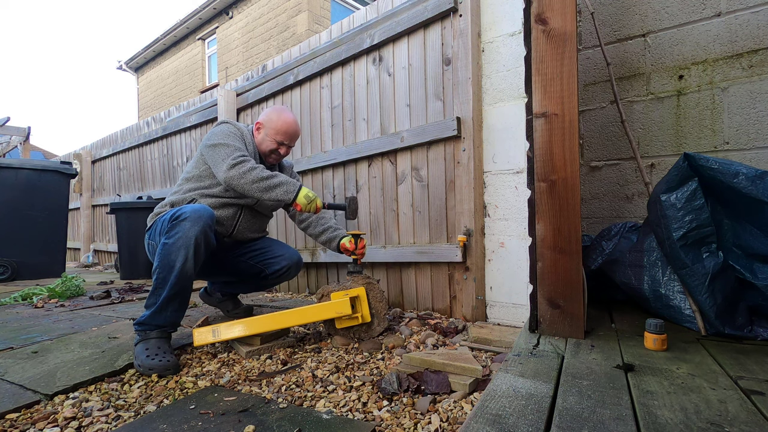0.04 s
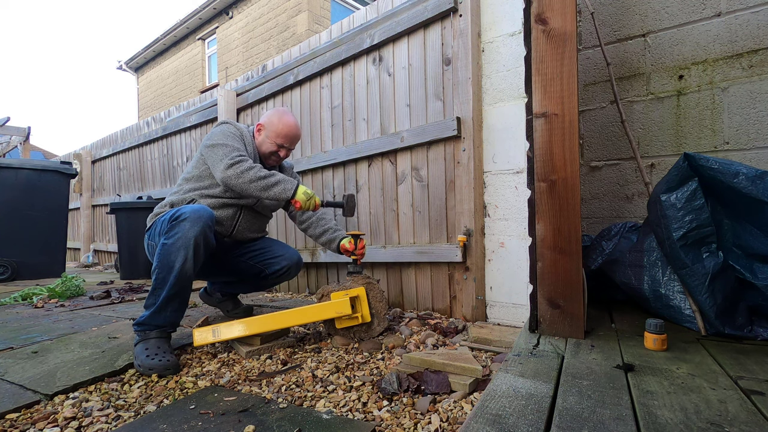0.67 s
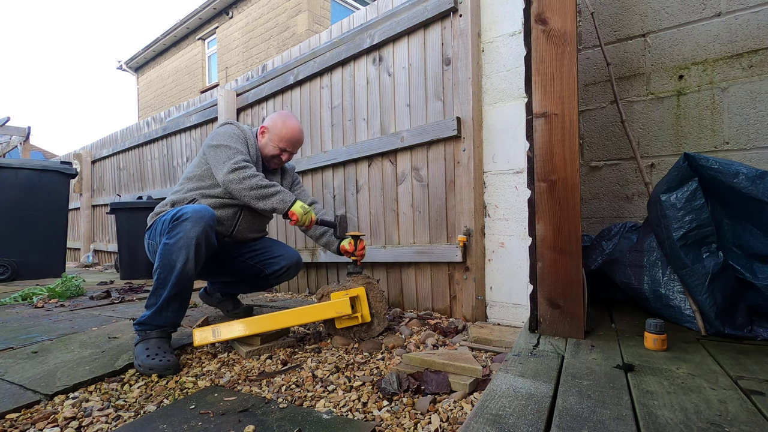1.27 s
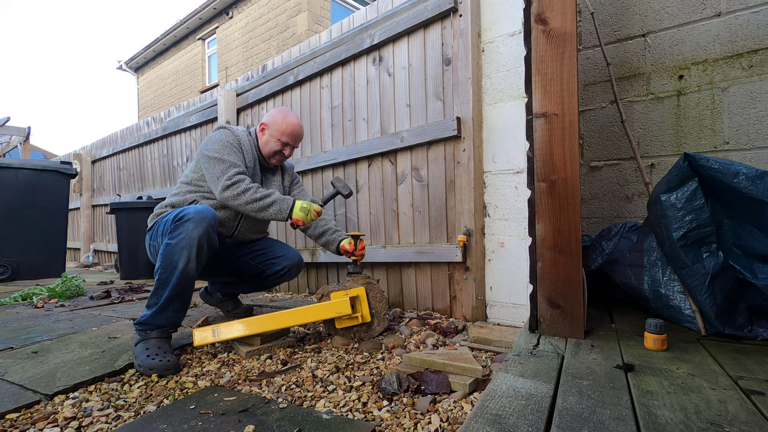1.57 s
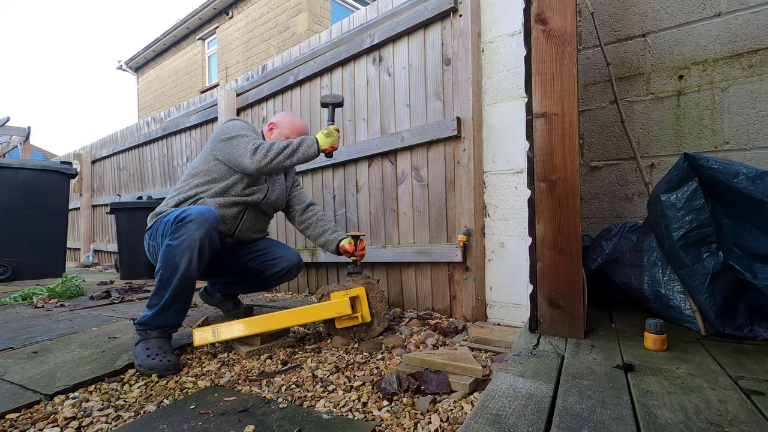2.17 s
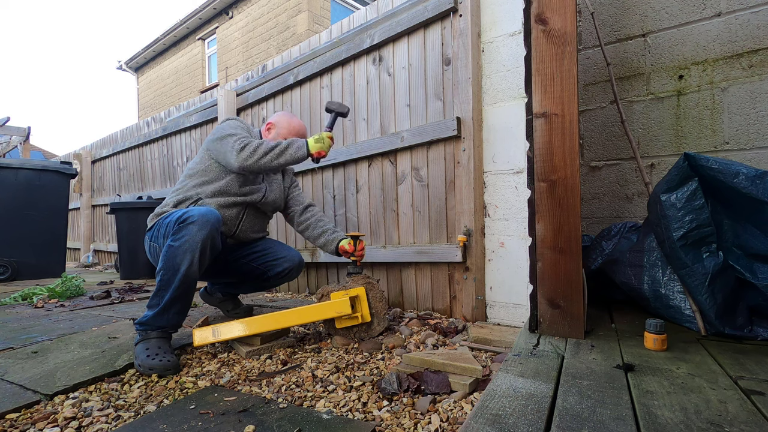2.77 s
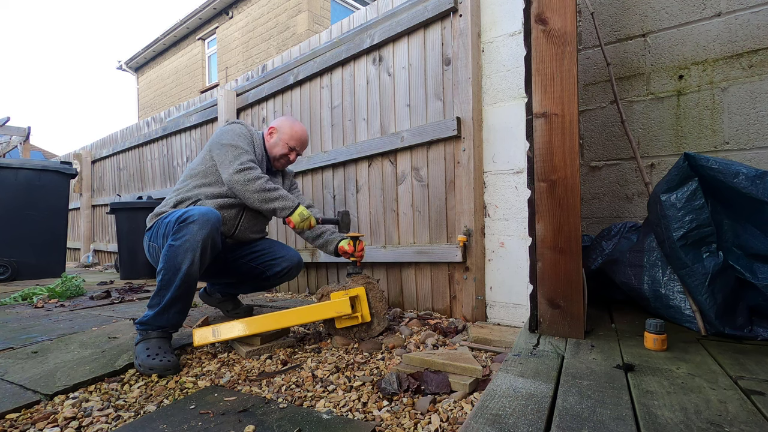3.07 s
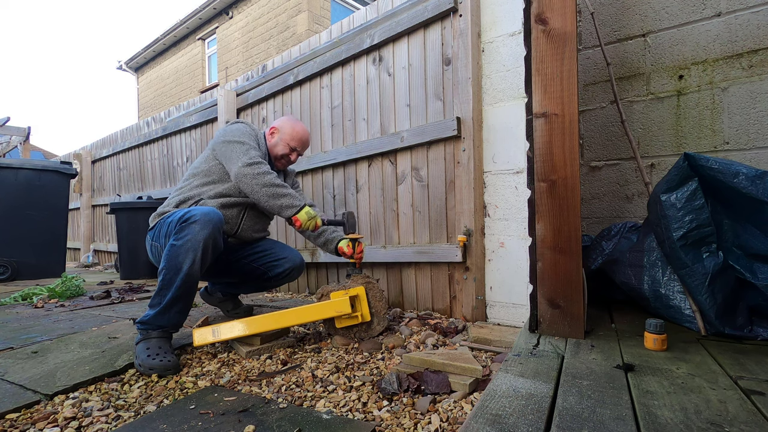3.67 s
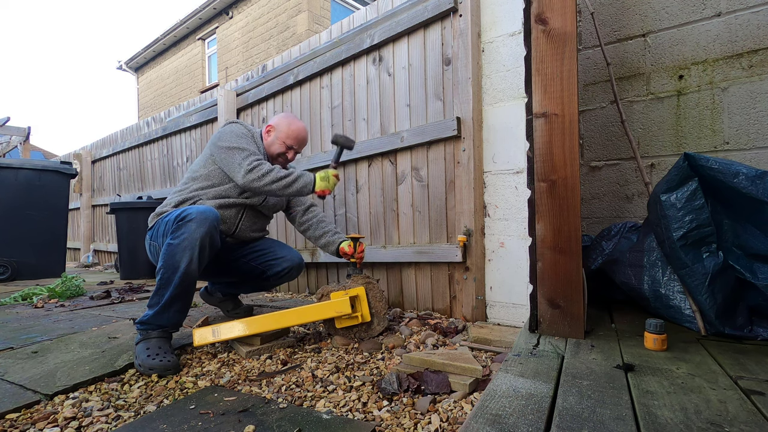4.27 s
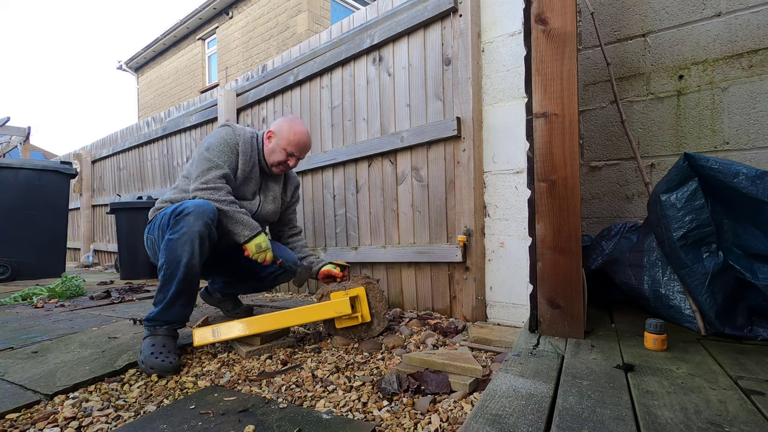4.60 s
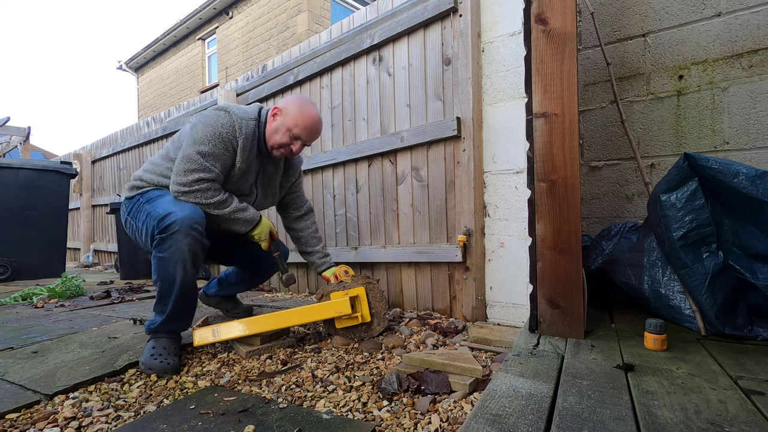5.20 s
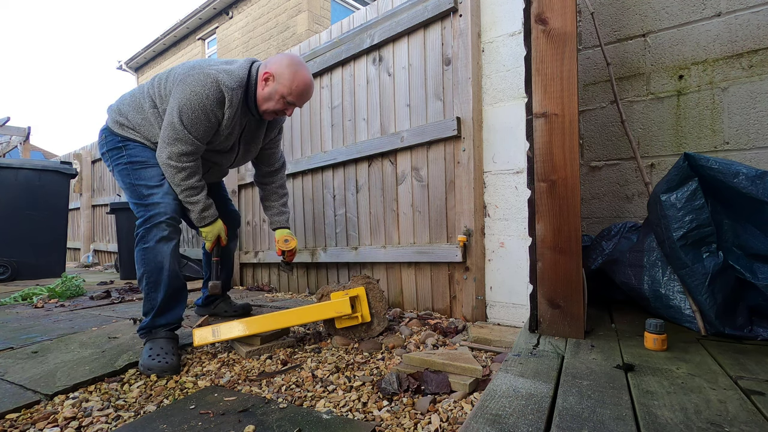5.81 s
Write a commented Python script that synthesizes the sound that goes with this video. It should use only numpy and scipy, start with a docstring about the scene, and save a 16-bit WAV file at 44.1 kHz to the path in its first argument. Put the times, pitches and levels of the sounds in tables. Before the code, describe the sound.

In a small back yard, steel cracks against steel close to the microphone as a hammer hits a chisel eight times, each slightly distorted blow ringing briefly and shaking a wooden fence. The final two are heavier and crush the concrete. Bits of stone fall, the loose chisel clinks faintly, and then the hammering gives way to quiet scuffs on gravel. A small bird and a low town rumble lie far behind.

```python
"""Sharp steel cracks: a club hammer drives a chisel into the concrete at the foot of a fence post.
Each blow overloads the microphone and sets the wooden fence booming and rattling in a small back yard;
the last two swell in harshly and crush the concrete. Chips clatter down, the loose chisel clinks,
boots shift on gravel, and a small bird sings over a far town rumble."""
import sys
import numpy as np
from scipy import signal
from scipy.fft import rfft, irfft, next_fast_len
from scipy.io import wavfile

SR = 44100
rng = np.random.default_rng(int(sys.argv[2]) if len(sys.argv) > 2 else 0)


def pcm_store(signal):
    """Save signal as 16-bit PCM."""
    levels = np.round(np.clip(np.atleast_2d(signal), -1, 1) * 32767)
    wavfile.write(sys.argv[1], SR, levels.astype(np.int16).T)


N = 257984
SIZE = 36000  # samples in a one-shot
AGE, TIME = np.arange(SIZE) / SR, np.arange(N) / SR

# hammer blows: t/s, crack/dB, boom/dB, tail/dB, crunch/dB, crunch t60/s, treble limit/Hz,
# chisel pitch/ratio, left lag/s, left minus right/dB, loosened grit/dB
BLOWS = [(0.0028, 5, 0, -28, -25, 0.29, 13800, 0.95, 0.0001, 1, -56),
         (0.6002, 6.5, 0, -28, -26.5, 0.39, 13000, 0.99, 0.00005, 1, -63),
         (1.2467, 1.5, 0, -27.5, -27, 0.29, 13200, 0.94, 0.000079, 2, -59),
         (1.9399, 2, -13, -36, -18.5, 0.27, 5100, 1.12, 0.000068, 3.5, -78),
         (2.5045, -0.5, -0.5, -27.5, -25, 0.11, 12900, 1.03, 0.000027, 2.5, -54.5),
         (3.14, 2.5, -2, -32, -32.5, 0.46, 13050, 1.023, 0.000058, 0, -64.5),
         (3.8007, 1.5, -2.5, -45.5, -16, 0.35, 12040, 0.97, 0.0000056, 0.9, -54),
         (4.5043, 3, -3.5, -52.5, -17, 0.43, 15000, 0.99, .000005, -0.5, -48)]
# the chisel seats differently each time, one list of resonances a blow: f/Hz, base width/Hz, level/dB
SEATINGS = [
    [(1700, 110, 3), (3160, 220, -1.5), (3640, 200, -3), (4600, 270, -3), (5170, 250, -5.5),
     (6400, 340, -2)],
    [(1650, 160, -5), (2470, 180, -3.5), (3750, 520, -4), (4340, 350, -1), (5060, 300, -10.5),
     (5900, 550, -8)],
    [(1680, 130, -20), (2400, 180, 0), (2770, 190, -3), (3720, 190, -6.5), (4260, 140, 2), (4760, 170, -4),
     (6280, 410, -7), (8540, 300, -12)],
    [(1510, 77, 8), (2500, 110, 4.5), (2885, 510, -1.5), (4100, 470, 0)],
    [(2380, 110, -3), (2730, 120, 3.5), (3670, 260, -6), (4370, 200, 3.5), (6370, 420, -2),
     (8480, 320, -7.5)],
    [(2300, 120, -5.5), (2910, 220, 4.5), (5060, 400, 4), (6560, 300, -9.5), (7900, 240, -5.5)],
    [(2210, 390, 1), (2470, 48, 1.5), (3460, 140, -1), (4030, 170, -2), (4240, 120, -6), (4580, 76, -3),
     (5350, 310, -16), (7850, 210, -22), (8600, 190, -20)],
    [(1350, 57, 3.5), (1790, 89, -2), (2180, 160, -3.5), (4060, 250, -8), (5030, 230, -20),
     (6170, 230, -15), (8550, 560, -15.5)],
]
# modes of the chisel pressed into concrete, the chisel held loosely, the fence: f/Hz, level/dB, t60/s
CHISEL_MODES = [(1740, -5.5, 0.0083), (2920, -11.5, 0.014), (4333, 1.5, 0.007), (5200, -19.5, 0.0096),
                (8350, -16.5, 0.012)]
LOOSE_CHISEL_MODES = [(1900, 4.5, 0.107), (1992, -1, 0.16), (2200, -29, .17), (2720, -4, 0.16),
                      (2780, 3, 0.028)]
FENCE_MODES = [(30, -30.5, 1), (43.7, -20.5, 0.84), (53.7, -34, 0.9), (75.65, -20, 0.56),
               (100.9, -18.5, 0.39), (116, -32.5, 0.2), (143.1, -27.5, 0.4), (170.3, -25, 0.28),
               (195, -16.5, 0.048), (305, -17.5, .06), (436.7, -36.5, 0.2)]
# tone curves of the noise layers: f/Hz, level/dB
CRACK_EQ = [(150, -10), (350, -7.5), (750, -17.5), (1600, -1.5), (4400, 0.5), (7000, -5.5), (11000, -11.5),
            (16000, -13)]
BOARDS_EQ = [(30, -9), (90, 9.5), (160, 5), (240, -1), (330, -6.5), (450, -17), (650, -36), (1500, -53.5)]
TAIL_EQ = [(300, -8), (600, -13), (1000, -16.5), (1600, -6.5), (3200, -7.5), (4700, -5.5), (6000, -17),
           (8500, -13.5), (10500, -20.5), (13000, -41.5), (16000, -57)]
CRUNCH_EQ = [(200, -5.5), (450, -6.5), (700, -11), (1400, -5.5), (2200, -3.5), (3100, -5), (4600, -3),
             (6500, -10), (8500, -17), (11000, -22), (14000, -29), (16000, -48)]
STONE_EQ = [(150, -13.5), (400, 8), (750, -10), (1400, 9), (4500, -6.5), (7500, -9), (11000, -25.5),
            (14000, -36), (16000, -41.5)]
GRIT_EQ = [(250, -4.5), (420, 0), (750, -2), (1300, -0.5), (2000, 2), (3000, -5), (5000, -7), (8000, -15),
           (12000, -19), (14000, -32), (16000, -49)]
TOWN_EQ = [(15, 6), (30, 6.5), (50, 2), (100, -4), (180, 1), (250, -8.5), (400, -22.5), (630, -32),
           (1000, -23.5), (2000, -35.5), (4500, -33.5), (8000, -40), (11000, -51.5), (14000, -74.5)]
# decay of the ringing tail: f/Hz, t60/s
TAIL_T60 = [(300, 0.11), (1000, 0.61), (2500, 0.67), (5000, 0.89), (9000, 0.22), (15000, 0.64)]
# stereo image of the yard's echo: f/Hz, left-right likeness (clipped to -1..1 in use)
YARD_LIKENESS = [(200, 0.5), (800, 0.09), (1700, 0.23), (3800, -0.039), (8000, -1.4)]
# ticks and a whistle ahead of a blow: blow t/s, last tick/dB, whistle/dB
LEAD_INS = [(0.5998, -19.5, -49.5), (1.2477, -13.5, -35.5), (1.9397, -29, -63.5), (2.5044, -6.5, -35),
            (3.1401, -11, -29)]
# harsh rushes into the heaviest blows: peak t/s, level/dB, time to rise 60 dB/s
SWELLS = [(3.7997, -13, .066), (4.5043, -12, .064)]
# resonances of the rush: f/Hz, width/Hz, level/dB
RUSH_PEAKS = [(2117, 260, 9.5), (3770, 630, 4.5), (5780, 1200, 2), (7500, 590, -3.5), (7990, 1100, 3)]
# larger chips and pebbles landing: t/s, level/dB, f/Hz, t60/s
CHIPS = [(0.218, -32, 4500, 0.054), (0.2442, -26.5, 1500, 0.1), (0.386, -42, 3500, 0.064),
         (0.5165, -42.5, 1770, 0.074), (0.8081, -36.5, 3240, 0.056), (1.49, -34, 4020, 0.02),
         (1.5272, -40.5, 2960, 0.066), (2.112, -46, 1584, 0.21), (4.0908, -40, 4860, 0.18),
         (4.125, -41, 2270, 0.26), (4.6323, -20, 1770, 0.083), (4.885, -34.5, 1320, 0.037),
         (5.076, -27.5, 1930, 0.012), (5.1181, -28, 1800, 0.017), (5.1457, -34, 2000, 0.046),
         (5.5367, -46, 1990, 0.046), (5.5786, -44.5, 1960, 0.17), (5.762, -44, 1910, 0.027)]
# soft knocks on the ground: t/s, level/dB, t60/s
THUMPS = [(0.2456, -49, 0.11), (1.065, -41, 0.74), (4.093, -33, 0.25), (4.6325, -23.5, 0.069),
          (4.885, -34.5, 0.4), (4.948, -38, 0.18), (5.239, -49, 0.11)]
# the loose chisel touches concrete: t/s, level/dB
CLINKS = [(0.2446, -34.5), (4.124, -37)]
# boots and hands shift on gravel: t/s, length/s, level/dB
SCUFFS = [(4.034, 0.18, -52.5), (4.225, 0.16, -54), (4.977, 0.36, -48.5), (5.469, 0.21, -53.5),
          (5.613, 0.38, -51.5)]
# bird notes: t/s, length/s, start f/Hz, end f/Hz, level/dB
BIRD_NOTES = [(0.954, 0.28, 7420, 6750, -69), (1.064, 0.13, 3480, 3300, -59), (2.2, 0.085, 5650, 5350, -55),
              (2.314, .035, 6280, 5550, -73), (2.339, 0.068, 5250, 5620, -53.5),
              (3.001, .11, 3530, 3740, -54)]
# fader ride of the town rumble: t/s, level/dB
TOWN_LEVEL = [(0, -48.5), (1.8, -47.5), (2.3, -45.5), (3.6, -51), (4.8, -44), (5.3, -43), (5.85, -43.5)]

FALL_S = 0.14  # loosened grit takes this long to reach the ground


def hammering():
    """Each hit stacks four layers: crack, ringing tail, concrete crunch and fence boom."""
    out = np.zeros((2, N))
    for blow, seating in zip(BLOWS, SEATINGS):
        s, crack_db, boom_db, tail_db, crunch_db, crunch_t60, top_hz, pitch, lag_s, pan_db, _ = blow
        resonances = [(hz, 1.5 * width, db) for hz, width, db in seating]
        hit = from_db(crunch_db) * concrete_crunch(resonances, top_hz, crunch_t60)
        hit += from_db(crack_db) * steel_crack(top_hz, pitch, lag_s, seating)
        hit += from_db(tail_db) * ringing_tail(resonances)
        pan = from_db([[pan_db / 2], [-pan_db / 2]])
        add(out, s, hit * pan + from_db(boom_db) * fence_boom())
    return out


def steel_crack(top_hz, pitch, lag_s, seating):
    """Steel on steel: the chisel rings briefly under a noise burst, reaching the right side first."""
    modes = [(hz * pitch, db, t60) for hz, db, t60 in CHISEL_MODES if hz < top_hz]
    steel = from_db(1.5) * struck(modes, scatter_db=3)
    steel = np.array([np.interp(AGE - lag_s, AGE, steel), steel])
    damped = [(hz, 2 * width, db + 6) for hz, width, db in seating]  # the hammer face is still on it
    burst = from_db(-6) * colour(noise(), CRACK_EQ, alike=0.92, peaks=damped, top_hz=top_hz)
    snap = 1 / (1 + (AGE / 0.0018) ** 3)
    return (steel + burst * snap) * attack(0.00068)


def fence_boom():
    """The post shakes the fence: panel modes bloom while loose boards rumble."""
    panels = -struck(FENCE_MODES, scatter_db=-1.04) * attack(0.0051)
    rumble = colour(noise(), BOARDS_EQ, alike=0.82)
    boards = rumble * (from_db(-27) * fade(0.36) + from_db(-18.5) * fade(0.087))
    fade_out = 1 / (1 + (AGE / 0.4) ** 4)  # the boom dies away faster after about 0.4 s
    return (panels + boards) * fade_out


def concrete_crunch(resonances, top_hz, t60):
    """Concrete breaks in a dense spray of tiny fractures, coloured by the chisel."""
    fractures = grains(per_s=7100, spread_db=2, grain_s=0.00049)
    return colour(fractures, CRUNCH_EQ, alike=1, peaks=resonances, top_hz=top_hz, ripple_db=3) * fade(t60)


def ringing_tail(resonances):
    """The clang lingers in the fence and between the yard walls, dying band by band."""
    spectrum = rfft(colour(noise(), TAIL_EQ, YARD_LIKENESS, resonances, ripple_db=5.5))
    hz = np.maximum(np.fft.rfftfreq(SIZE, 1 / SR), 1)
    centres, t60s = np.transpose(TAIL_T60)
    bands = [np.interp(np.log(hz), np.log(centres), row) for row in np.eye(len(centres))]
    ring = sum(irfft(spectrum * band, SIZE) * fade(t60) for band, t60 in zip(bands, t60s))
    fade_out = 1 / (1 + (AGE / 0.31) ** 6)  # the tail dies away quickly after about 0.3 s
    lean_left = from_db([[1.7], [-1.7]])
    return ring * fade_out * attack(0.003) * lean_left


def lead_ins(ticks=3, gap_s=0.0105, step_db=11.5, whistle_hz=7940, rise_s=0.06):
    """A fast crescendo of ticks and a thin whistle lead into the ringing blows."""
    out = np.zeros((2, N))
    envelope = (fade(0.004) + from_db(-10) * fade(0.026)) * attack(0.00083)
    whistle = np.sin(2 * np.pi * whistle_hz * TIME)
    for s, tick_db, whistle_db in LEAD_INS:
        for k in range(ticks):  # counting back from the blow
            tick = colour(noise(), TAIL_EQ, alike=0.23, top_hz=8000) * envelope
            add(out, s - (k + 1) * gap_s, from_db(tick_db - k * step_db) * tick)
        out += from_db(whistle_db) * whistle * fade(rise_s, np.abs(s - TIME)) * (TIME < s)
    return out


def swells():
    """A harsh, reversed noise burst rushes into each of the last two blows."""
    out = np.zeros((2, N))
    for s, db, rise_s in SWELLS:
        rush = colour(noise(), CRUNCH_EQ, alike=0.99, peaks=RUSH_PEAKS, ripple_db=5.5) * fade(rise_s)
        add(out, s - SIZE / SR, from_db(db) * np.flip(rush, axis=1))
    return out


def falling_chips():
    """Chips clatter down, each with one resonance and a faint echo."""
    out = np.zeros((2, N))
    for s, db, hz, t60 in CHIPS + stray_chips():
        contacts = grains(per_s=2500, spread_db=2, grain_s=0.0009)
        clatter = colour(contacts, STONE_EQ, alike=0.99, peaks=[(hz, 0.087 * hz, 10)])
        envelope = (fade(t60) + from_db(-22.5) * fade(1)) * attack(0.00037)
        add(out, s, from_db(db) * clatter * envelope)
    return out


def stray_chips(count=3, spread_s=0.38, low_hz=1600, high_hz=5000, t60=0.028):
    """Each blow throws small chips at random, the late ones softer; returns rows like CHIPS."""
    rows = []
    for s, *_, grit_db in BLOWS:
        for late, small in rng.random((count, 2)):
            hz = low_hz * (high_hz / low_hz) ** small
            rows.append((s + FALL_S + late * spread_s, grit_db + 15 - 6 * late, hz, t60))
    return rows


def thumps():
    """Boots, tools and lumps hit the ground with a dull knock."""
    out = np.zeros((2, N))
    for s, db, t60 in THUMPS:
        add(out, s, from_db(db) * colour(noise(), BOARDS_EQ, alike=1) * fade(t60) * attack(0.00099))
    return out


def chisel_clinks():
    """Held loosely, the chisel rings longer as it taps the concrete."""
    out = np.zeros((2, N))
    for s, db in CLINKS:
        add(out, s, from_db(db) * struck(LOOSE_CHISEL_MODES, scatter_db=2.5))
    return out


def gravel(trickle_t60=0.9):
    """Small stones rub and click: grit trickles after each blow, and each scuff swells and fades."""
    flow = np.zeros((1, N))
    trickle = np.minimum(AGE / FALL_S, 1) * fade(trickle_t60, np.maximum(AGE - FALL_S, 0))
    for s, *_, grit_db in BLOWS:
        add(flow, s, from_db(grit_db) * trickle)
    for s, length, db in SCUFFS:
        add(flow, s, from_db(db) * np.sin(np.pi * np.minimum(AGE / length, 1)))
    stones = grains(per_s=260, spread_db=5, grain_s=0.0074, size=N)
    return flow * colour(stones, GRIT_EQ, alike=1)


def bird(buzz_hz=110):
    """Thin, slightly buzzy gliding notes, smeared by distance."""
    out = np.zeros((2, N))
    buzz = 0.02 * np.sin(2 * np.pi * buzz_hz * AGE)
    for s, length, start_hz, end_hz, db in BIRD_NOTES:
        along = np.clip(AGE / length, 0, 1)
        hz = (start_hz + (end_hz - start_hz) * along) * (1 + buzz)
        note = np.sin(np.pi * along) * np.sin(2 * np.pi * np.cumsum(hz) / SR)
        echoes = noise() * fade(0.25)
        echoes /= np.sqrt(np.sum(echoes ** 2))
        wet = signal.fftconvolve(note[None], echoes, axes=1)[:, :SIZE]
        add(out, s, from_db(db) * (0.2 * note + 0.75 * wet))
    return out


def town_rumble():
    """The far town: a dark, nearly mono bed that drifts slowly in level."""
    level_db = np.interp(TIME, *np.transpose(TOWN_LEVEL))
    return from_db(level_db) * colour(noise(N), TOWN_EQ, alike=0.99)


def from_db(db):
    """Decibels to gain."""
    return 10 ** (np.asarray(db) / 20)


def at_hz(points, hz):
    """Read a curve on a log-frequency axis."""
    f, value = np.transpose(points)
    return np.interp(np.log(hz), np.log(f), value)


def attack(tau_s):
    """Exponential rise to full level."""
    return 1 - np.exp(-AGE / tau_s)


def fade(t60, age=AGE):
    """Exponential decay, 60 dB in t60 seconds."""
    return from_db(-60 * age / max(t60, 1e-3))


def add(out, s, sound):
    """Mix a sound in from time s."""
    start = int(np.clip(round(s * SR), 0, N - 1))
    out[:, start:start + sound.shape[-1]] += sound[..., :N - start]


def noise(size=SIZE):
    """Two white noises."""
    return rng.standard_normal((2, size))


def grains(per_s, spread_db, grain_s, size=SIZE):
    """Noise chopped into tiny fractures of very uneven strength."""
    strength = from_db(spread_db * np.minimum(rng.exponential(1, size), 4))
    clicks = (rng.random(size) < per_s / SR) * strength ** 2
    power = signal.lfilter([1], [1, -np.exp(-1 / (grain_s * SR))], clicks + 1e-12)
    return noise(size) * np.sqrt(power)


def struck(modes, scatter_db):
    """Decaying sines, balanced a little differently on every hit."""
    return sum(from_db(db + scatter_db * rng.standard_normal()) * np.sin(2 * np.pi * hz * AGE) * fade(t60)
               for hz, db, t60 in modes)


def colour(source, eq, alike, peaks=(), top_hz=20000, ripple_db=0):
    """Shape two unrelated signals into stereo with an EQ, resonances and left-right likeness; rms 1."""
    length = source.shape[-1]
    padded = next_fast_len(length)
    hz = np.maximum(np.fft.rfftfreq(padded, 1 / SR), 1)
    power = from_db(at_hz(eq, hz)) ** 2
    for centre, width, peak_db in peaks:
        power += from_db(peak_db) ** 2 / (1 + ((hz - centre) / width) ** 2) ** 2
    gain = np.sqrt(power / (1 + (eq[0][0] / hz) ** 4) / (1 + (hz / top_hz) ** 8))  # low and high cut
    ripple_hz = np.arange(0, SR / 2, 70)  # many small overlapping modes
    gain *= from_db(ripple_db * np.interp(hz, ripple_hz, rng.standard_normal(len(ripple_hz))))
    alike = np.clip(alike if np.isscalar(alike) else at_hz(alike, hz), -1, 1)
    mid, side = rfft(source, padded) * gain
    mid, side = mid * np.sqrt(1 + alike), side * np.sqrt(1 - alike)
    stereo = irfft(np.array([mid + side, mid - side]), padded)[:, :length]
    return stereo / np.sqrt(np.mean(stereo ** 2) + 1e-20)


def scene():
    """Hammering up front, debris around it, bird and town far behind."""
    bed = town_rumble()
    hits = hammering() + lead_ins() + swells()
    foley = falling_chips() + thumps() + chisel_clinks() + gravel()
    return hits + foley + bird() + bed


def record(dry):
    """The cracks overload the microphone into soft clipping; a steep low-pass trims the top."""
    clipped = dry / (1 + dry ** 6) ** (1 / 6)
    cutoff_hz = 16200
    return signal.sosfilt(signal.ellip(10, 0.1, 80, cutoff_hz, fs=SR, output="sos"), clipped)


dry = scene()
out = record(dry)
pcm_store(out)
```